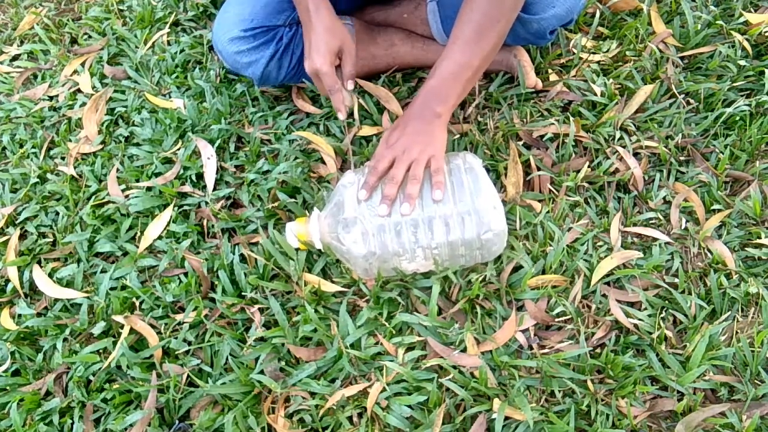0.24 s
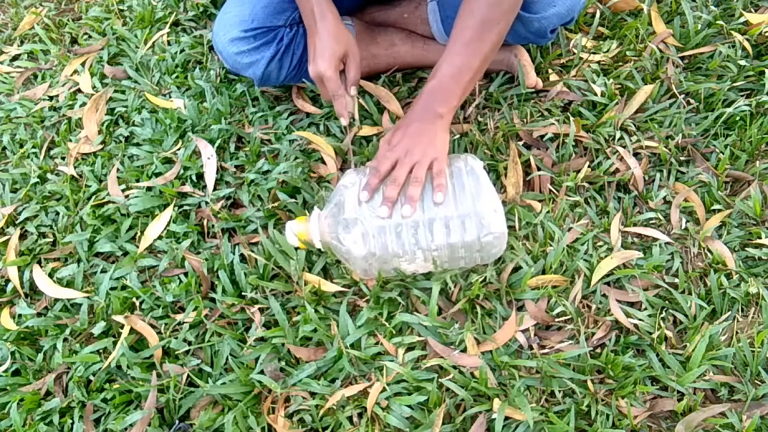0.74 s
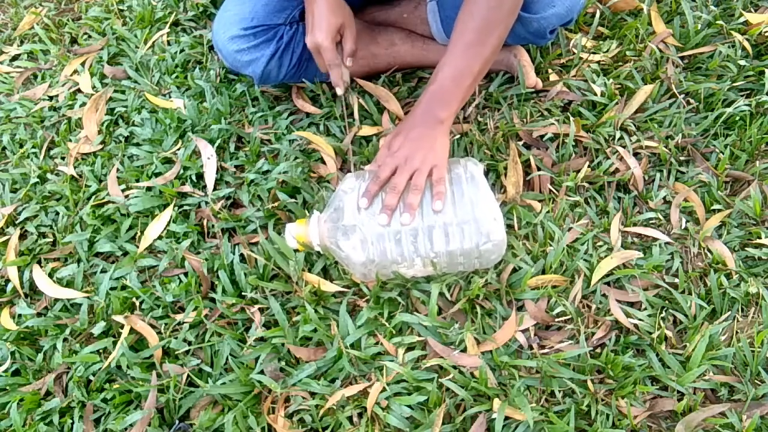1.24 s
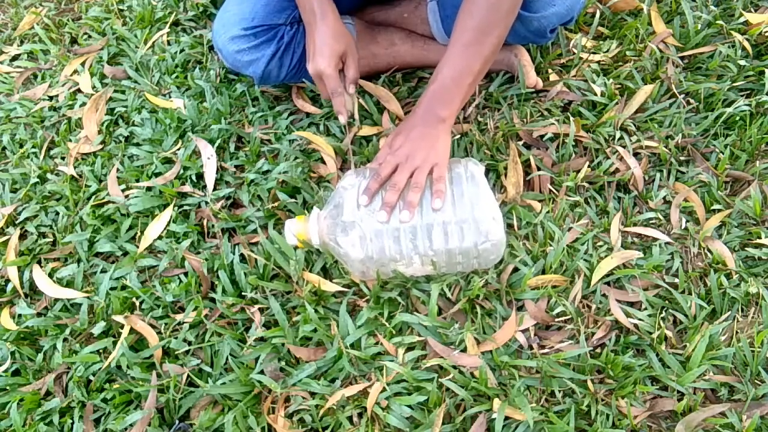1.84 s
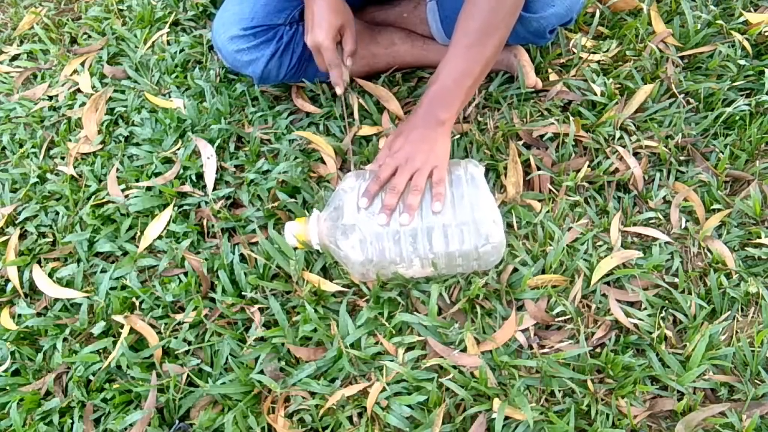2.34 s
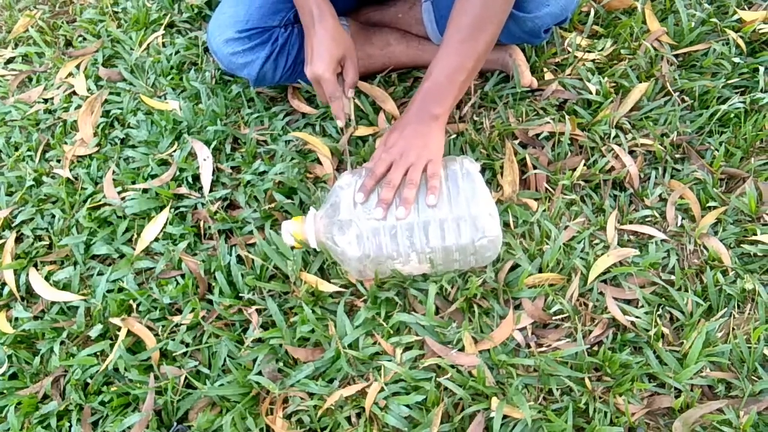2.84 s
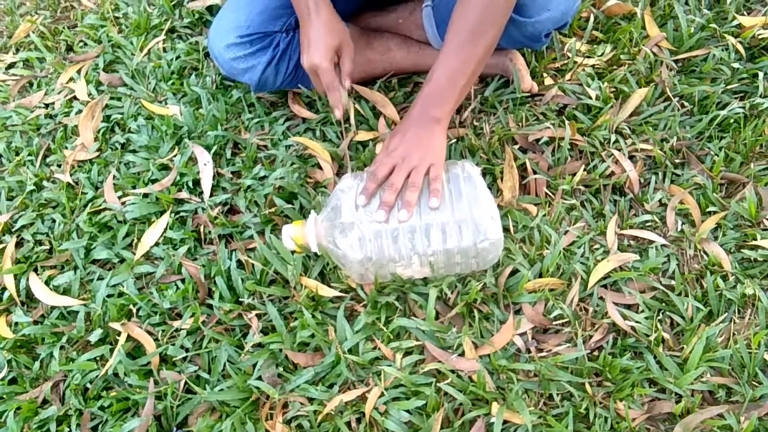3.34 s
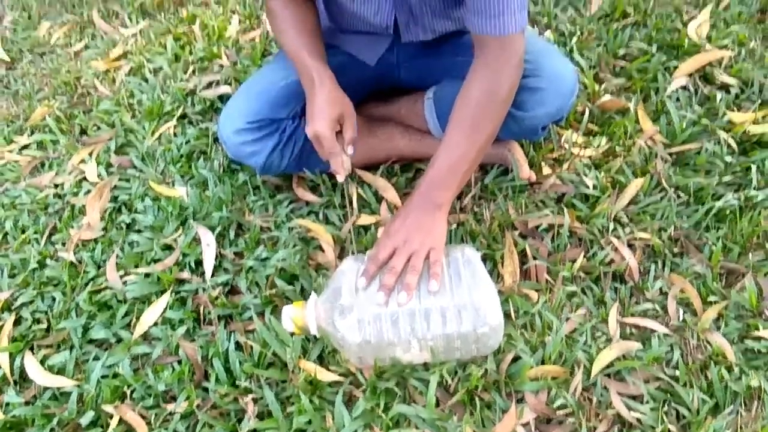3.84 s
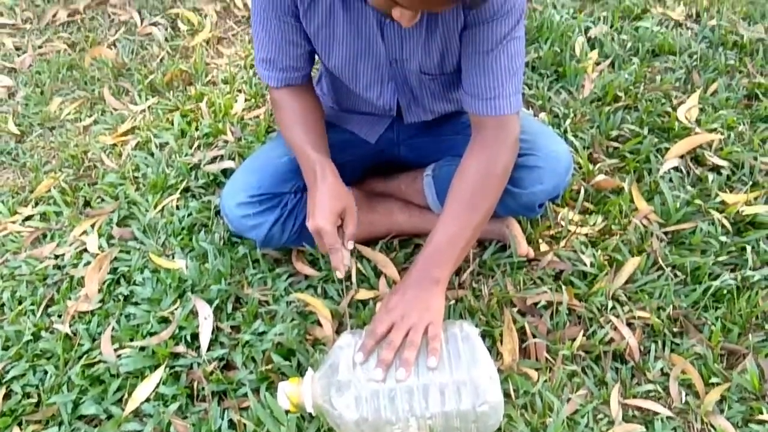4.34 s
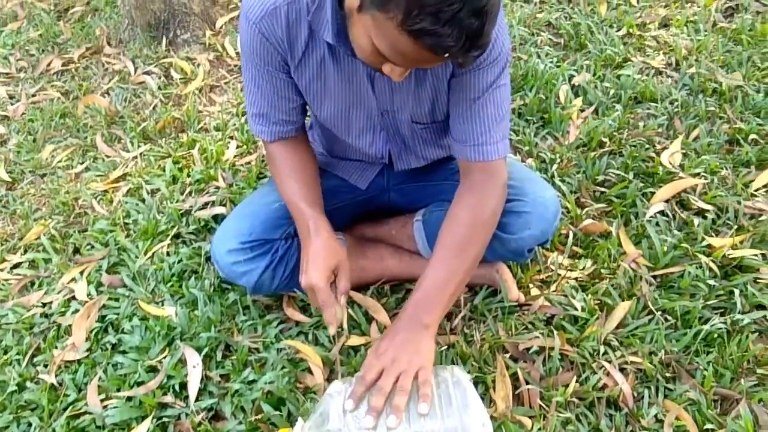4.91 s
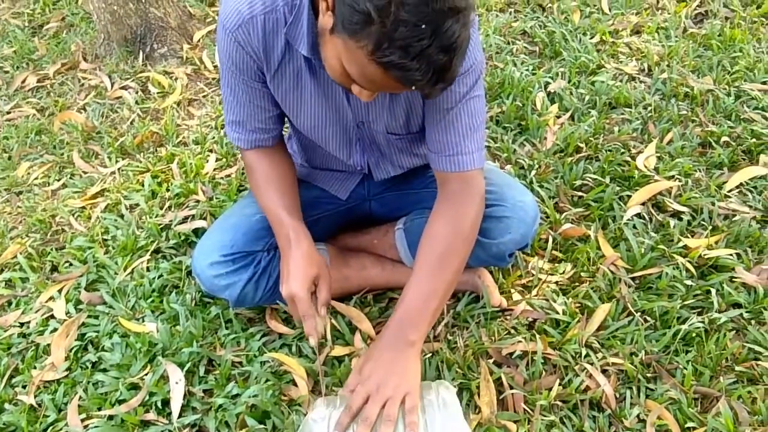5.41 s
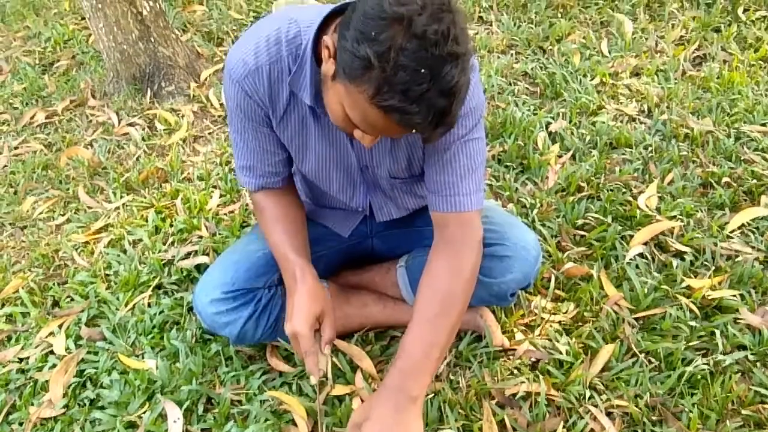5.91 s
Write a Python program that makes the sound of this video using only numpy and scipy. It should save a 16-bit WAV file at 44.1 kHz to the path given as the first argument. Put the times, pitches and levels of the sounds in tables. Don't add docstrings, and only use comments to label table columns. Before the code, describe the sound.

A rasping stroke is already under way at 0 s, followed by a couple of light touches, then a toothed blade saws to and fro through an empty plastic bottle. Strokes last about 0.15 s and come roughly every 0.17 s, with tiny gaps. Each is a coarse, gritty buzz: hollow low booming from the belly, stiff midrange rattle from the panels and cut rim, and thin steel ringing on top. Hard snags pop at stroke starts, notably near 0.5, 2.7 and 3.5 s. Faint bird chirps slip in around 0.1, 1.0, 1.2 and 1.9 s. From about 3.6 to 4.2 s sawing pauses; a far bird whistles upward, with a small scrape near 3.9 s and a hoarser rising call at 4.1 s. Sawing resumes at 4.2 s, steady from about 4.5 s until the end just past 6 s. Soft rustling accompanies the strokes in quiet, dry open air, close to a phone microphone.

```python
import sys
import numpy as np
from scipy import signal
from scipy.fft import rfft, irfft
from scipy.io import wavfile
from scipy.ndimage import uniform_filter1d, map_coordinates

SR = 44100
rng = np.random.default_rng(int(sys.argv[2]) if len(sys.argv) > 2 else 0)


def magnitude_from_level(level_db):
    exponent = np.asarray(level_db, float) / 20
    return 10 ** exponent


def dump(signal):
    limited = np.clip(np.atleast_2d(signal).T, -1, 1)
    pcm = np.round(limited * 32767).astype(np.int16)
    wavfile.write(sys.argv[1], SR, pcm)


N = 272097
RING_SIZE = 2 ** 14


def unit(x):
    return x / np.sqrt(np.mean(x ** 2) + 1e-20)


def along(points, hz):
    f, value = np.transpose(points)
    return np.interp(np.log(hz + 1), np.log(f + 1), value)


def wobble(length, step):
    knots = rng.standard_normal(int(length / step) + 4)
    return map_coordinates(knots, [np.arange(length) / step])


def hiss(colour, db):
    noise = rfft(rng.standard_normal(N))
    gain = magnitude_from_level(along(colour, np.fft.rfftfreq(N, 1 / SR)))
    return magnitude_from_level(db) * unit(irfft(noise * gain, N))


def body(modes, force, vary_db, shift_hz):
    f = np.fft.rfftfreq(RING_SIZE, 1 / SR)
    gains = magnitude_from_level(vary_db * rng.standard_normal(len(modes)))
    shifts = shift_hz * rng.standard_normal(len(modes))
    power = 0
    for gain, shift, (centre, width, db) in zip(gains, shifts, modes):
        off_peak = (centre + shift) ** 2 - f * f
        power = power + (gain * magnitude_from_level(db) * f * width) ** 2 / (off_peak ** 2 + (f * width) ** 2)
    skirt = 1 / (1 + (f / (1.3 * modes[-1][0])) ** 10) / (1 + (.75 * modes[0][0] / (f + 1)) ** 10)
    cepstrum = irfft(np.log(power * skirt + magnitude_from_level(along(force, f)) ** 2) / 2)
    cepstrum[1:RING_SIZE // 2] *= 2
    cepstrum[RING_SIZE // 2 + 1:] = 0
    response = np.exp(rfft(cepstrum))
    return response / np.sqrt(np.mean(abs(response) ** 2))


def ring(force, response):
    return irfft(rfft(force, RING_SIZE) * response, RING_SIZE)


def catches(length, per_second, spread_db, scrape):
    chance = rng.random(length)
    size = rng.standard_normal(length)
    noise = rng.standard_normal(length)
    kicks = (chance < per_second / SR) * magnitude_from_level(spread_db * np.clip(size, -2, 2)) * np.sign(noise)
    clumps = magnitude_from_level(1.2 * wobble(length, 220))
    return unit((unit(kicks) + scrape * noise) * clumps)


def stroke(s, length, full_s, db, sharp_db, parts, gain, fade, halt_s):
    slow_s = length - halt_s
    full_s = np.clip(full_s, .002, slow_s - .002)
    fade_db = -fade * (slow_s - full_s)
    arm_db = db + np.array([-gain * full_s, 0, fade_db, fade_db])
    extra_db = dict(belly=(0.41 - 1) * (arm_db + 31), panels=0, rim=0.35 * sharp_db, steel=sharp_db)
    levels_db = {part: arm_db + np.array(parts[part]) + extra_db[part] for part in parts}
    edge = np.clip(0.1 + 0.18 * sharp_db, 0, 1)
    return s + np.array([0, full_s, slow_s, length]), levels_db, edge


# t/s, length/s, full speed after/s, level/dB, sharpness/dB
BACK_STROKES = [(0.0, 0.083, 0.0024, -34.5, -2.5), (0.312, 0.16, 0.044, -34, 3),
                (0.7, 0.15, 0.073, -35, -1.5), (1.069, 0.14, 0.061, -36.5, -1.5),
                (1.397, .18, 0.073, -36.5, 0), (1.78, 0.14, 0.081, -36, -1.2),
                (2.128, 0.16, 0.041, -34.5, -1.5), (2.489, 0.17, 0.1, -27.5, -3.5),
                (2.882, 0.16, 0.025, -33, -3), (3.206, 0.19, 0.06, -28, 1.3), (4.231, 0.22, 0.096, -34, -1),
                (4.642, 0.14, 0.059, -27, 2.5), (4.986, 0.13, 0.046, -29, 0.9),
                (5.338, 0.13, 0.0083, -29.5, 0.3), (5.678, 0.13, 0.038, -30, 0.4),
                (6.039, 0.14, 0.028, -33, 1.5)]
BACK_PARTS = dict(belly=(-5, -10, -5.5, -9.5), panels=(-1.5, 0.5, 1, -33), rim=(-1, 4, 0.5, -28),
              steel=(-13, -11.5, -12, -46))


def pulls():
    return [stroke(*row, BACK_PARTS, gain=77, fade=39, halt_s=0.03) for row in BACK_STROKES]


# t/s, length/s, fullest after/s,
# level/dB, dies by/dB
LIGHT_TOUCHES = [(0.107, 0.028, 0.0055, -47.5, 18.5), (0.139, 0.061, 0.016, -46.5, -10),
                 (4.633, 0.023, .004, -50, 7), (4.801, 0.007, 0.0098, -51, 8),
                 (2.49, 0.013, 0.0045, -37, 11.5), (4.108, .02, .004, -47, 15),
                 (5.139, .008, .006, -46, 10), (0.507, 0.031, 0.0043, -29.5, 18),
                 (1.595, 0.025, 0.021, -46.5, 17), (3.929, .065, 0.0021, -35.5, 50.5),
                 (4.09, 0.15, 0.013, -56.5, 17.5), (4.454, 0.026, 0.0043, -36, 39)]
TOUCHED_PARTS = dict(belly=3.4, panels=.1, rim=-1, steel=-18)


def touches():
    moves = []
    for s, length, full_s, db, dies_db in LIGHT_TOUCHES:
        t = np.linspace(0, length, num=8)
        arm_db = db - dies_db * np.abs(t - full_s) / length
        moves.append((s + t, {part: arm_db + v for part, v in TOUCHED_PARTS.items()}, 0))
    return moves


# t/s, length/s, full speed after/s, level/dB, sharpness/dB
AWAY_STROKES = [(0.195, 0.11, 0.051, -31.5, 6.5), (0.54, 0.14, 0.044, -30, 6),
                (0.898, 0.15, 0.052, -30.5, 2.5), (1.252, 0.14, 0.029, -29.5, -1.5),
                (1.623, 0.13, 0.029, -29.5, -4), (1.972, 0.14, 0.042, -30.5, 1.5),
                (2.334, 0.16, 0.044, -29.5, -3), (2.71, 0.15, 0.072, -32, -8),
                (3.057, 0.15, 0.049, -30, -3.5), (3.428, 0.15, 0.069, -33, 0.5),
                (4.479, 0.13, 0.027, -36, 1.5), (4.81, 0.16, 0.087, -32, -3.5),
                (5.143, 0.17, 0.11, -29.5, -3.5), (5.497, 0.16, 0.062, -31.5, -3.5),
                (5.848, 0.16, 0.057, -32, -2)]
AWAY_PARTS = dict(belly=(2, -12.5, -9, -23.5), panels=(0.5, -.5, 0.5, -39), rim=(0, 3.5, -2.5, -32),
              steel=(-7, -4.5, -13, -41))


def pushes():
    return [stroke(*row, AWAY_PARTS, gain=60, fade=47, halt_s=0.046) for row in AWAY_STROKES]


# f/Hz, width/Hz, level/dB
BELLY_MODES = [(177.5, 20, 5), (223.3, 22, 0.5), (344, 89, -1.3), (392.7, 16, 5.1)]
PANEL_MODES = [(606, 22.3, 2), (715, 73, -2.5), (804, 92, -0.5), (1020, 320, -1), (1117, 32.6, 3)]
RIM_MODES = [(1360, 27, -2), (1604, 84, 4), (1734, 100, 2), (1873, 160, 2), (2112, 100, -2.5),
             (2585, 70, -1.5), (2843, 190, -7)]
STEEL_MODES = [(3600, 43, -6), (3900, 47, 5.5), (4170, 45, 8), (4417, 47, 6), (4710, 510, 0.5),
               (5180, 26, -4.5), (6060, 70, -6.5), (6370, 22, -2.5), (8970, 180, -7.5), (9970, 390, -16.5)]
# f/Hz, level/dB
BELLY_COLOUR = [(20, -44), (80, -14.5), (170, -20), (450, -21.5), (600, -11.5), (1500, -79.5)]
PANEL_COLOUR = [(200, -57.5), (480, -38), (620, -6), (1200, -26), (1600, -8.5), (4000, -61.5)]
RIM_COLOUR = [(500, -45.5), (1100, -19.5), (1400, -0.5), (2300, -4), (3200, -15.5), (4200, -53),
              (8000, -52.5)]
STEEL_COLOUR = [(1500, -34.5), (3000, -4.5), (3600, 3.5), (5000, -10), (6000, -9.5), (9000, -7),
                (11500, -16.5), (13000, -27.5), (16000, -36)]
# t/s, damping/dB
PALM_PRESS = [(0, 0.5), (.6, -1), (1.2, -1.2), (1.8, 0.5), (2.4, -0.6), (2.8, 0.7), (3.3, -0.7), (3.5, 1.5),
              (3.95, -4), (4.3, -.6), (4.6, 1.2), (4.7, -3.5), (4.82, -0.3), (5.05, 0.8), (5.4, 1),
              (5.75, 2.5), (5.95, 0), (6.15, 1)]
PALM_SHARE = dict(belly=.3, panels=0.77, rim=-0.72, steel=0)


def sawing():
    # part, modes, colour, chatter dB, mode variation dB, mode shift Hz
    bodies = [("belly", BELLY_MODES, BELLY_COLOUR, .8, 2.5, 14),
              ("panels", PANEL_MODES, PANEL_COLOUR, .9, 3.5, 14),
              ("rim", RIM_MODES, RIM_COLOUR, .9, 3.5, 14),
              ("steel", STEEL_MODES, STEEL_COLOUR, 1.9, 3.5, 40)]
    out = np.zeros(N + RING_SIZE)
    for s, levels_db, edge in pulls() + touches() + pushes():
        start = max(round(s[0] * SR), 0)
        t = (start + np.arange(SR // 4)) / SR
        bite = (1 - np.exp(-np.abs(t - s[0]) / 0.0018)) * (t < s[-1])
        stall_db = sum(row[4] * np.exp(-((t - row[0] - .016) / 0.015) ** 2) for row in SNAG_KICKS)
        force = bite * catches(len(t), per_second=2200, spread_db=3.0, scrape=0.73) * magnitude_from_level(-stall_db)
        tick = magnitude_from_level(-60 * np.arange(200) / SR / 0.0046)
        ticks = np.convolve(rng.random(len(t)) < 140 / SR, tick)[:len(t)]
        damping_db = np.interp(t, *np.transpose(PALM_PRESS))
        travel = np.pi / 2 * np.clip((t - s[0]) / (s[-1] - s[0]), 0, 1)
        for part, modes, colour, chatter_db, vary_db, shift_hz in bodies:
            swing = uniform_filter1d(np.interp(t, s, magnitude_from_level(.5 * levels_db[part])), size=700) ** 2
            chatter = unit(magnitude_from_level(chatter_db * wobble(len(t), 492)))
            push = force * swing * magnitude_from_level(-PALM_SHARE[part] * damping_db) * chatter
            if part == "steel":
                push = push * (1 + 1.8 * ticks)
                push = push - edge * np.roll(push, 1)
            for share in np.cos(travel), np.sin(travel):
                out[start:start + RING_SIZE] += ring(push * share, body(modes, colour, vary_db, shift_hz))
    return out[:N]


# f/Hz, level/dB
AIR_COLOUR = [(20, -11), (90, 1), (200, -2), (320, -7), (3000, -15), (16000, -36)]
# f/Hz, level/dB (per Hz)
RUSTLE_COLOUR = [(30, -4.5), (250, -7), (1000, -0.5), (4000, -5.5), (6000, -17.5), (16000, -29)]


def air(saw):
    busy = np.abs(signal.fftconvolve(saw ** 2, np.ones(1800) / 1800)[:N])
    gate = busy / (busy + magnitude_from_level(-100))
    rustle = magnitude_from_level(0.33 * wobble(N, 750)) * hiss(RUSTLE_COLOUR, -57.5)
    return hiss(AIR_COLOUR, -78) + gate * rustle


# t/s, length/s, from f/Hz, to f/Hz, level/dB
CLEAR_WHISTLES = [
    (3.635, .1, 2400, 2620, -72),
    (3.73, .1, 2640, 3020, -74),
    (3.83, .04, 2980, 3000, -87),
    (3.868, .06, 3050, 3180, -87),
    (1.197, .035, 4150, 4450, -56),
    (1.228, .036, 4500, 3230, -55),
    (1.93, .045, 3950, 4800, -63),
    (0.115, .03, 4500, 4900, -64),
    (1.015, .035, 3700, 3600, -58),
]
BLURRED_WHISTLES = [
    (4.105, .06, 2650, 3050, -63),
    (4.16, .065, 3050, 3400, -62),
    (4.0, .05, 2950, 3000, -88),
]


def bird():
    out = np.zeros(N)
    settles = 2.6
    whistles = [(row, .3) for row in CLEAR_WHISTLES] + [(row, 1.1) for row in BLURRED_WHISTLES]
    for (s, length, from_hz, to_hz, db), blur in whistles:
        u = np.arange(round(length * SR)) / (length * SR)
        slide = (1 - np.exp(-settles * u)) / (1 - np.exp(-settles))
        phase = 2 * np.pi * np.cumsum(from_hz + (to_hz - from_hz) * slide) / SR
        level = np.sin(np.pi * u) ** .3 * magnitude_from_level(db + 2.5 + 3 * wobble(len(u), 400))
        out[round(s * SR):][:len(u)] += level * np.sin(phase + blur * wobble(len(u), 90))
    return out


# t/s, peak level/dB, f/Hz, steel level/dB (over peak), stall/dB (negative: surge)
SNAG_KICKS = [(0.154, -15, 2010, -13, -6), (0.313, -28.5, 716, -4, 4.5), (0.337, -11.5, 1840, -21, 4),
              (0.502, -9.5, 730, -10, 23), (0.548, -6.5, 2020, -20, -2.5), (0.906, -11.5, 624, -15, -2),
              (1.068, -12.5, 1680, -22, -4.5), (1.78, -17, 1130, -20, -5), (2.13, -18, 1880, -16.5, -3.5),
              (2.712, -10.5, 744, -15.5, 3.5), (2.73, -7, 710, -11.5, -3.5),
              (2.884, -13.5, 574, -15.5, 11.5), (3.545, -6, 1185, -16, -4), (3.932, -34, 682, -33.5, 8),
              (4.235, -21, 1310, -31, -3), (4.486, -15.5, 1950, -9.5, 0), (4.815, -9, 1660, -20.5, -1),
              (4.988, -16.5, 1160, -15.5, 10.5), (5.147, -7, 1750, -19, -1),
              (5.321, -20.5, 1080, -18, -0.5), (5.358, -20, 1930, -8, -5), (5.501, -20, 815, -22, 2),
              (5.848, -9.5, 770, -15, 9), (6.039, -17.5, 1770, -13.5, 3.5)]


def snags():
    out = np.zeros(N + RING_SIZE)
    t = np.arange(1500) / SR
    for s, db, hz, steel_db, _ in SNAG_KICKS:
        jolt = rng.standard_normal(len(t)) * magnitude_from_level(-60 * t / 0.019) * (1 - np.exp(-t / 0.00089))
        jolt[4] = 1.64
        wall_modes = PANEL_MODES + [(hz, 150, 6)] + RIM_MODES
        wall = magnitude_from_level(-4.5) * ring(jolt, body(wall_modes, PANEL_COLOUR, vary_db=0.5, shift_hz=15))
        belly = magnitude_from_level(-19) * ring(jolt, body(BELLY_MODES[:2], BELLY_COLOUR, vary_db=2, shift_hz=7.2))
        steel = magnitude_from_level(steel_db + 1) * ring(jolt, body(STEEL_MODES, STEEL_COLOUR, vary_db=1.5, shift_hz=5))
        out[round(s * SR):][:RING_SIZE] += magnitude_from_level(db) * (wall + belly + steel)
    return out[:N]


def yard(x):
    t = np.arange(SR // 3) / SR
    tail = rng.standard_normal(len(t)) * magnitude_from_level(-60 * t / 0.018) * (t > .003)
    return signal.fftconvolve(x, tail / np.linalg.norm(tail))[:N]


def scene():
    saw = sawing() + snags()
    return (saw + magnitude_from_level(-12.5) * yard(saw) + bird() + air(saw))[None]


def low_pass(x):
    return signal.sosfilt(signal.butter(12, 16480, fs=SR, output="sos"), x)


def record(dry):
    kept = irfft(rfft(dry) * (np.fft.rfftfreq(N, 1 / SR) < 15700), N)
    return low_pass(kept)


dry = scene()
out = record(dry)
dump(out)
```